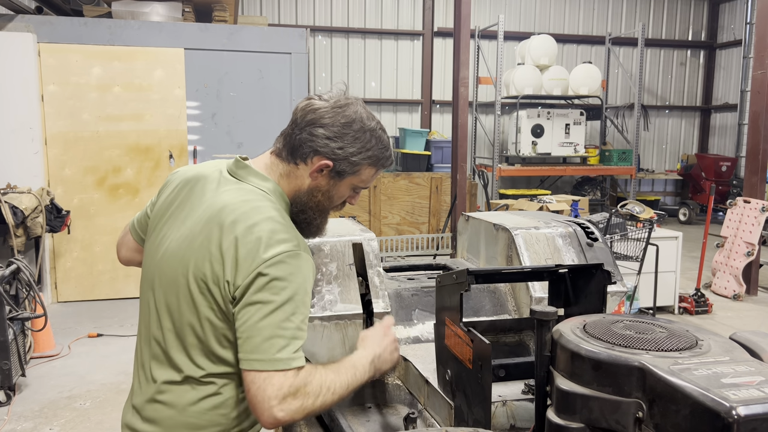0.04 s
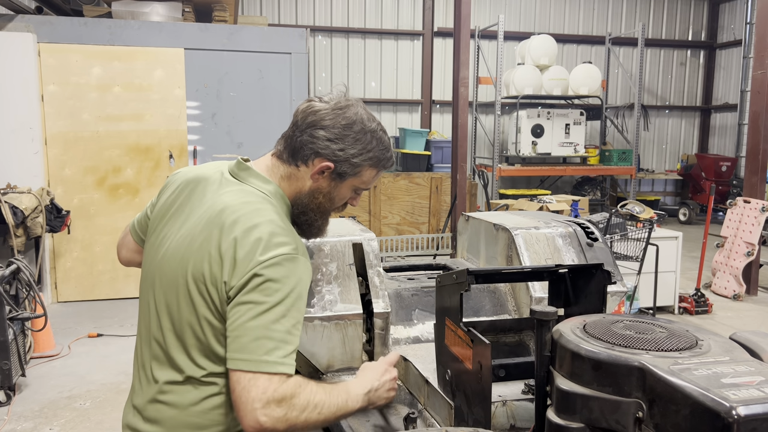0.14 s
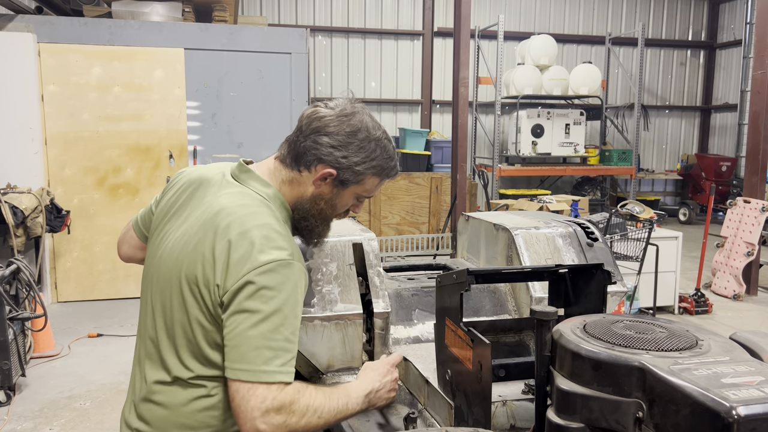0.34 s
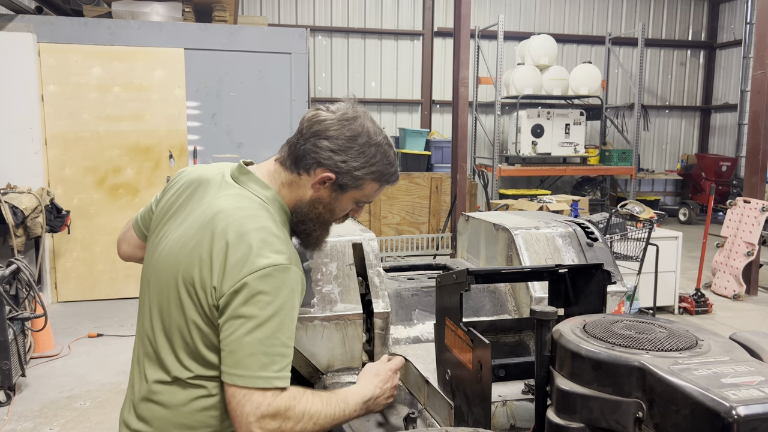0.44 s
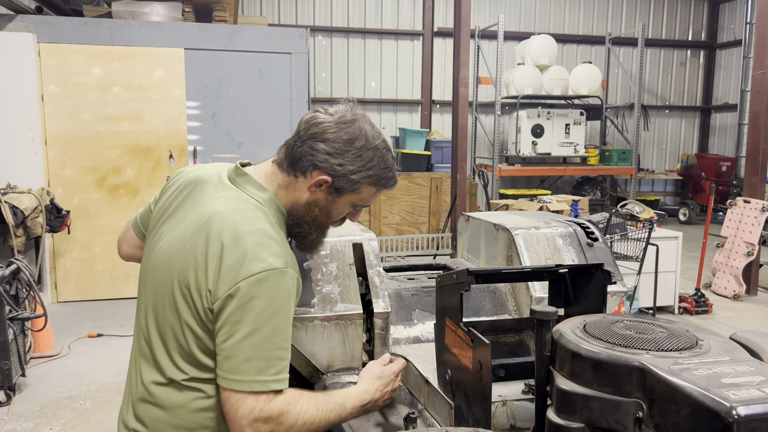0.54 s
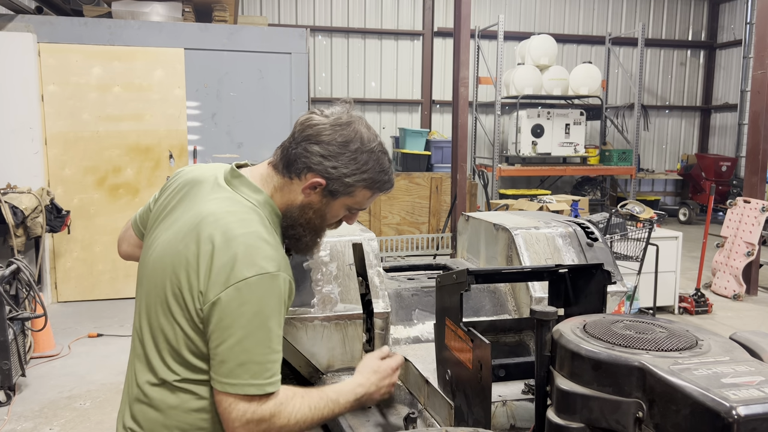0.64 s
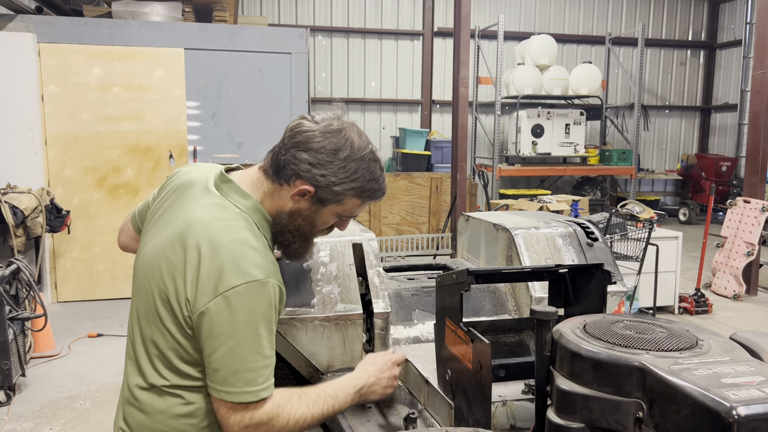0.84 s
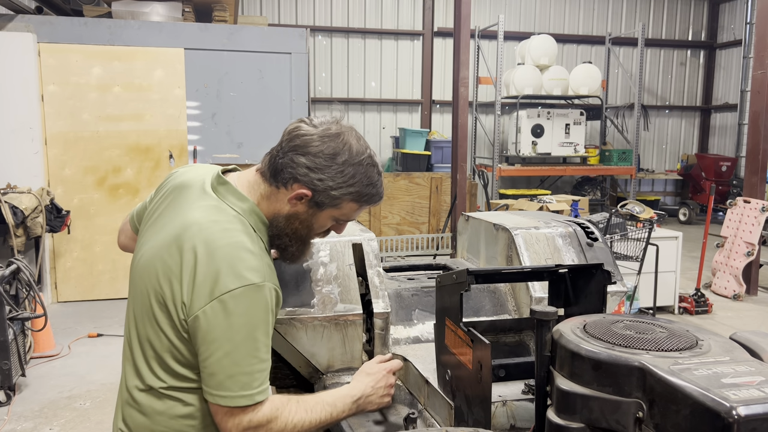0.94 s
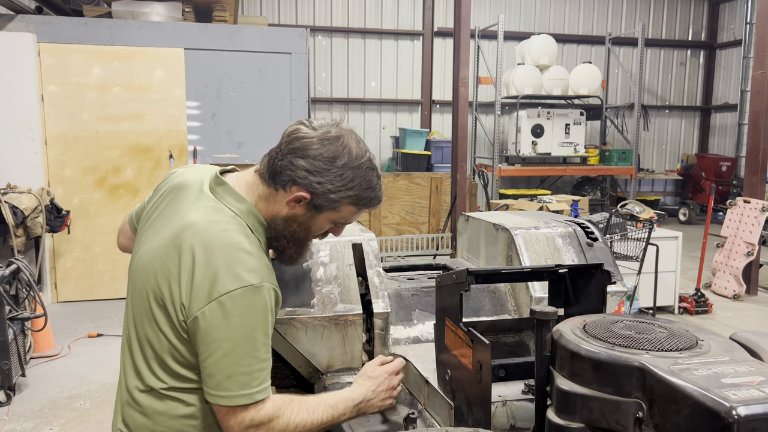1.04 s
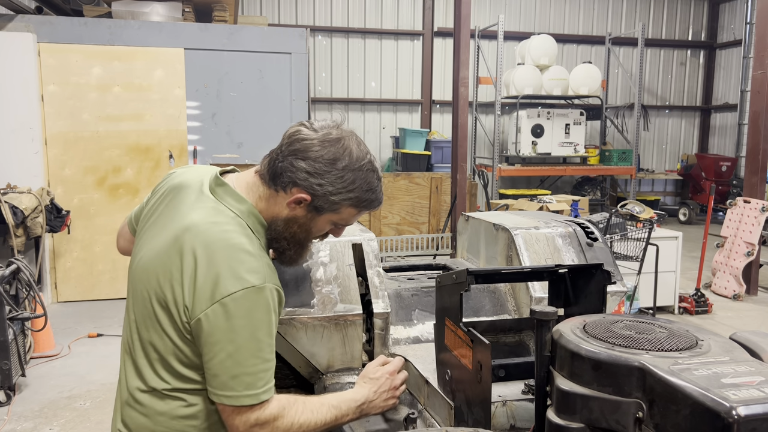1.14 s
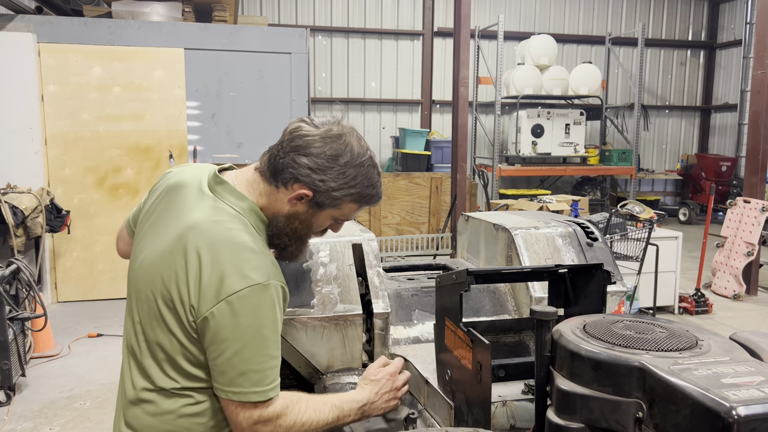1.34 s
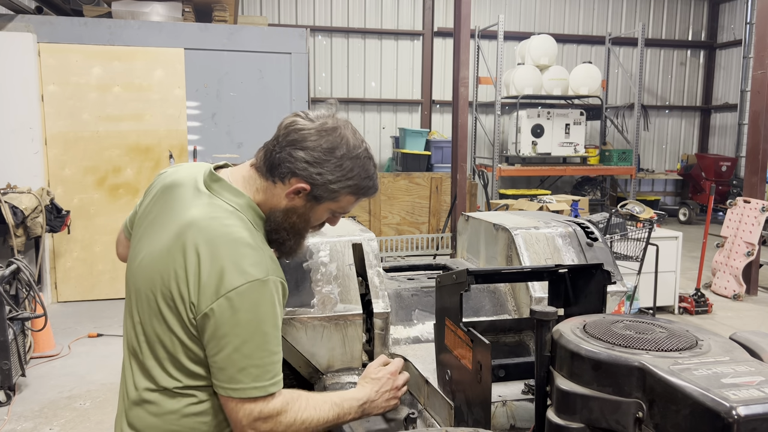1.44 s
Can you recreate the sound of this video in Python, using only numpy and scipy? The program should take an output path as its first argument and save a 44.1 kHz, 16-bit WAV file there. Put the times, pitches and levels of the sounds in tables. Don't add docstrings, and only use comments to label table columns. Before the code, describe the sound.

Gear shift lever thrown with a scrape, click and loud metal clunk, then faint settling knocks

```python
import sys
import numpy as np
from scipy import signal
from scipy.io import wavfile
from scipy.ndimage import uniform_filter1d

SR = 44100
rng = np.random.default_rng(int(sys.argv[2]) if len(sys.argv) > 2 else 0)


def field_ratio(decibels):
    return 10 ** (np.asarray(decibels, dtype=float) / 20)


def generate_wav(sig):
    pcm = np.round(np.clip(np.atleast_2d(sig).T, -1, 1) * 32767).astype(np.int16)
    wavfile.write(sys.argv[1], SR, pcm)


N = 66150
BLOW_T = np.arange(SR // 2) / SR


def band(x, lo_hz, hi_hz, order=2):
    sos = signal.butter(order, [lo_hz, min(hi_hz, .47 * SR)], "band", fs=SR, output="sos")
    return signal.sosfilt(sos, x)


def unit(x):
    return x / np.sqrt(np.mean(x ** 2))


def fade(t, t60_s):
    return np.exp(-np.log(1000) * t / t60_s)


def swell(t, rise_s):
    return 1 - np.exp(-t / rise_s)


def add(out, start_s, x):
    i = int(start_s * SR)
    out[i:i + len(x)] += x[:N - i]


def ring(modes, t, weight_db=0):
    scatter_db, detune = 1.5, .004
    hz, db, t60_s = np.array(modes).T[:, :, None]
    strength, shift, phase = rng.standard_normal((3, len(modes), 1))
    size = field_ratio(db + weight_db)
    tone = np.sin(2 * np.pi * (hz * (1 + detune * shift) * t + phase))
    partials = size * field_ratio(scatter_db * strength) * tone * fade(t, t60_s)
    return partials.sum(axis=0) / np.sqrt(np.sum(size ** 2))


# (frequency [Hz], level [dB], t60 [s])
HOUSING_MODES = [(295, -8, 0.1), (344.6, 2, 0.1), (390, 0, 0.06), (427.5, -4.5, 0.092), (475.3, -15, 0.12)]
# (time [s], level [dB])
THUMPS = [(.043, -28.5), (.086, -16.5), (.108, -17.5), (.138, 1.5), (.181, -22.5), (.251, -29), (.674, -26),
          (.716, -21), (.857, -28), (.872, -31.5), (1.079, -29.5), (1.19, -47.5)]


def housing_thumps(out):
    t = BLOW_T
    thud_db, thud_t60_s, rise_s = -7, .1, .0036
    for start_s, db in THUMPS:
        thud = unit(band(rng.standard_normal(len(t)), 220, 520)) * fade(t, thud_t60_s)
        thump = ring(HOUSING_MODES, t) + field_ratio(thud_db) * thud
        add(out, start_s, field_ratio(db) * thump * swell(t, rise_s))


# (frequency [Hz], level [dB], t60 [s])
LEVER_MODES = [(522.6, -2, 0.67), (639.8, 2.5, .18), (745, -4, .1), (757.6, -11, .06), (881, -1.5, 0.24),
               (986, -1, 0.3), (1075, 4, .1), (1140, 1.5, .12), (1340, -3.5, .06), (1453, -1, 0.2),
               (1588, -10.5, 0.09), (1811, -3, 0.08), (1937, 4.5, 0.059), (2043, -1.5, .08)]
# (frequency [Hz], level [dB], t60 [s])
LINKAGE_MODES = [(2420, 0, .07), (2830, -5.5, .07), (3380, -1, .05), (3975, -0.5, .05), (4140, -6, .035),
                 (4360, -7.5, .03), (5545, -1.5, 0.087), (5890, -2, 0.019), (7770, -9.5, .03),
                 (8530, -6.5, .02), (9840, -7, .025), (10900, -2.5, .03), (12400, 6, .03), (14800, 0, .02)]


def strike(t, hz, octaves):
    crack_db, crack_t60_s, t60_slope = -3, .09, -.5
    chatter_db, chatter_s, rise_s = 3, .007, .00038
    modes = LEVER_MODES + LINKAGE_MODES
    mode_hz = np.array(modes)[:, :1]
    weight_db = -24 * (np.log2(mode_hz / hz) / octaves) ** 2

    lo_hz = hz / 2 ** (octaves / 2)
    hi_hz = min(hz * 2 ** (octaves / 2), 18000)
    steps = np.repeat(rng.standard_normal(len(t) // 50 + 1), 50)[:len(t)]
    chatter = field_ratio(chatter_db * steps * (t < 2 * chatter_s))
    decay = fade(np.maximum(t - chatter_s, 0), crack_t60_s * (hz / 1000) ** t60_slope)
    crack = band(rng.standard_normal(len(t)) * chatter * decay, lo_hz, hi_hz, order=3)
    crack = crack * np.sqrt(SR / 2 / (hi_hz - lo_hz))
    return (ring(modes, t, weight_db) + field_ratio(crack_db) * crack) * swell(t, rise_s)


# (time [s], level [dB], centre [Hz], spread [octaves])
STRIKES = [(0.029, -53, 2483, 2.2), (0.044, -36.5, 1000, 1.8), (0.042, -39, 6830, 3),
           (.081, -20.5, 3085, 1.42), (.081, -30.5, 10000, 1.2), (0.089, -27.5, 1000, 1.46),
           (.126, -35, 10030, 1.1), (.1365, -6, 1265, 1.65), (.136, -16.5, 4268, 0.88),
           (0.135, -17.5, 11000, 1.57), (.143, -16.5, 600, 0.67), (0.155, -28, 1512, 3),
           (.157, -34, 9000, 1.5), (.181, -33, 10450, 1.3), (0.217, -35, 11000, 0.85),
           (.251, -31.5, 9080, 1.1), (.645, -46.5, 3500, 1.1), (.665, -37, 2450, 0.76),
           (0.662, -55, 8500, 1.2), (0.674, -38, 2300, 1.5), (.675, -39, 942, 0.82),
           (.673, -47.5, 7130, 0.61), (0.698, -53, 7190, 0.46), (0.695, -56, 12500, 0.54),
           (.7145, -32, 2086, 0.85), (.720, -33.5, 875, 0.78), (.860, -56.5, 9530, 0.86),
           (.866, -41, 2040, 1.8), (1.075, -44, 1360, 1.11), (1.077, -54, 2470, 0.47)]


def metal_strikes(out):
    for start_s, db, hz, octaves in STRIKES:
        add(out, start_s, field_ratio(db) * strike(BLOW_T, hz, octaves))


# (frequency [Hz], level [dB], t60 [s])
FRAME_MODES = [(108.2, -11, 0.4), (166.7, -7, .4), (193, -7.5, 1), (224.9, 0, 0.48), (508, -6, 1),
               (566, -0.5, 0.14), (640.4, -2.5, 0.48), (1093, 2, 0.14)]


def frame_boom(out):
    t = BLOW_T
    boom = ring(FRAME_MODES, t) * swell(t, .028) * fade(t, 1.3)
    add(out, .139, field_ratio(-10.5) * boom)


# (frequency [Hz], level [dB], t60 [s])
PIN_MODES = [(4480, -31, 0.23), (12540, 5, 0.14), (12600, -8, 0.24), (13760, -6, .1), (13830, -6, .14),
             (15060, -10, .04)]


def pin_ring(out):
    add(out, .863, field_ratio(-55) * ring(PIN_MODES, BLOW_T) * swell(BLOW_T, .0016))


# (time [s], level [dB], centre [Hz], spread [octaves])
CREAKS = [
    (1.248, -69.5, 3480, 1.24),
    (1.263, -70, 6764, 1.5),
    (1.278, -69, 9700, 1.5),
    (1.299, -68.5, 9830, 1.3),
    (1.359, -71.5, 11000, 0.96),
    (1.373, -62, 8000, 2.4),
    (1.414, -78, 4000, 0.4),
]


def hand_creaks(out):
    for start_s, db, hz, octaves in CREAKS:
        add(out, start_s, field_ratio(db) * strike(BLOW_T, hz, octaves))


def lever():
    out = np.zeros(N)
    housing_thumps(out)
    metal_strikes(out)
    frame_boom(out)
    pin_ring(out)
    hand_creaks(out)
    return out


def half_octave_noise(hz):
    return band(rng.standard_normal(N), hz / 2 ** .25, hz * 2 ** .25)


# (frequency [Hz], level [dB], t60 [s])
HALL = [(120, -19, 2.2), (214, -22, 0.7), (400, -23, 1.14), (1000, -18, 0.61), (2000, -22, 0.96),
        (4000, -22.5, 1.187), (8000, -20.5, 0.8), (13570, -32.5, 0.45)]


def hall(x):
    near_db, near_t60_s, rise_s = 7.5, .17, .0058
    t, tail = np.arange(N) / SR, 0
    table_hz, table_db, table_t60_s = np.array(HALL).T
    for hz in 90 * 2 ** np.arange(0, 7.6, .5):
        db = np.interp(np.log(hz), np.log(table_hz), table_db)
        t60_s = np.interp(np.log(hz), np.log(table_hz), table_t60_s)
        decay = fade(t, t60_s) + field_ratio(near_db) * fade(t, near_t60_s)
        tail = tail + half_octave_noise(hz) * field_ratio(db) * decay
    return signal.fftconvolve(x, tail * swell(t, rise_s) / 10)[:N]


def walk(rate_hz):
    k = int(SR / rate_hz)
    steps = np.repeat(rng.standard_normal(N // k + 1), k)
    smooth = uniform_filter1d(uniform_filter1d(steps, k), k)
    return unit(smooth[:N])


# (frequency [Hz], density [dB per Hz])
AIR = [(15, -31), (25, 0), (129, -4), (179, -4), (411, -13.5), (458, -25), (668, -11), (724, -24),
       (15600, -56)]


def air():
    air_db, flicker_db, out = -45, 1., 0
    table_hz, table_db = np.array(AIR).T
    for hz in 25 * 2 ** np.arange(0, 9.6, .5):
        db = np.interp(np.log(hz), np.log(table_hz), table_db)
        out = out + half_octave_noise(hz) * field_ratio(db + flicker_db * walk(6))
    return unit(out) * field_ratio(air_db)


def scene():
    dry = lever()
    return (dry + hall(dry) + air())[None]


def top_cut(x):
    return signal.sosfilt(signal.butter(12, 15750, fs=SR, output="sos"), x)


def record(dry):
    top_hz, clip = 15700, .995
    low_pass = signal.ellip(8, .2, 60, top_hz, fs=SR, output="sos")
    mix = np.clip(signal.sosfilt(low_pass, dry), -clip, clip)
    return top_cut(mix)


dry = scene()
out = record(dry)
generate_wav(out)
```